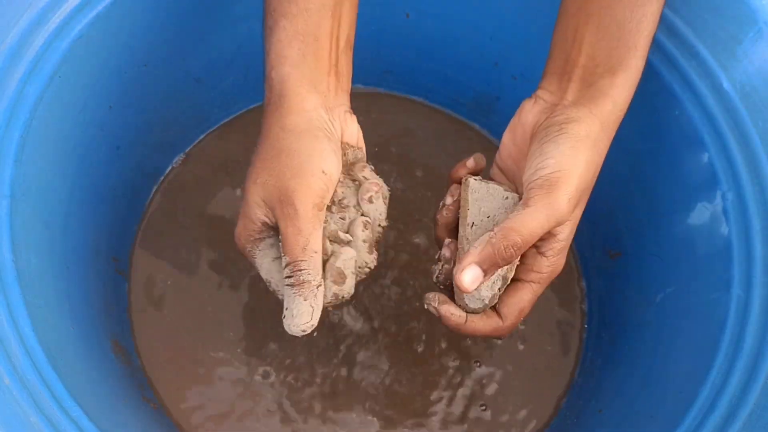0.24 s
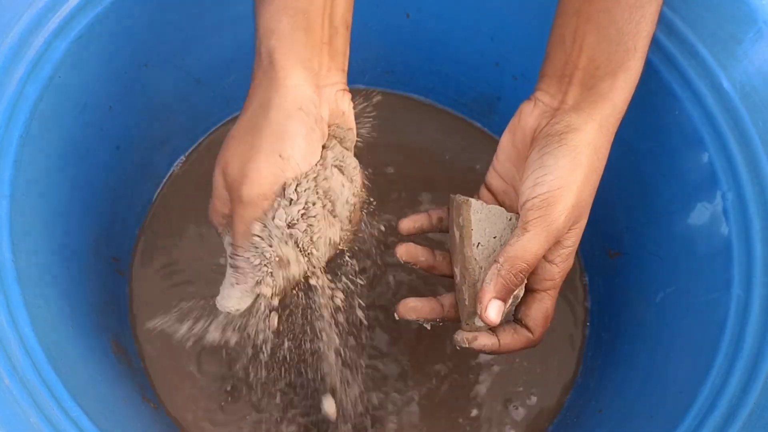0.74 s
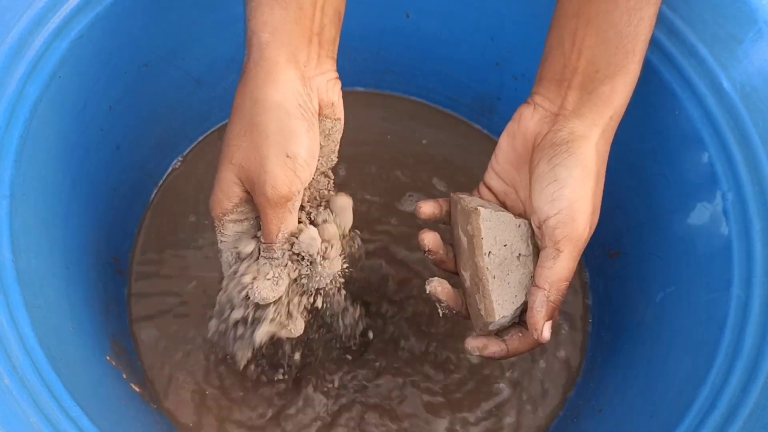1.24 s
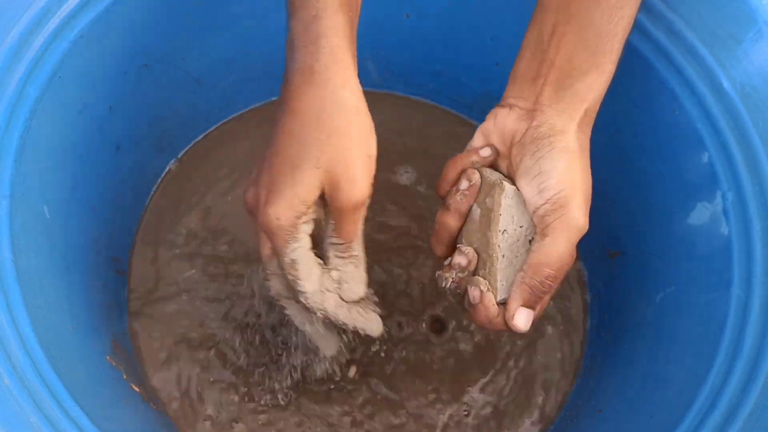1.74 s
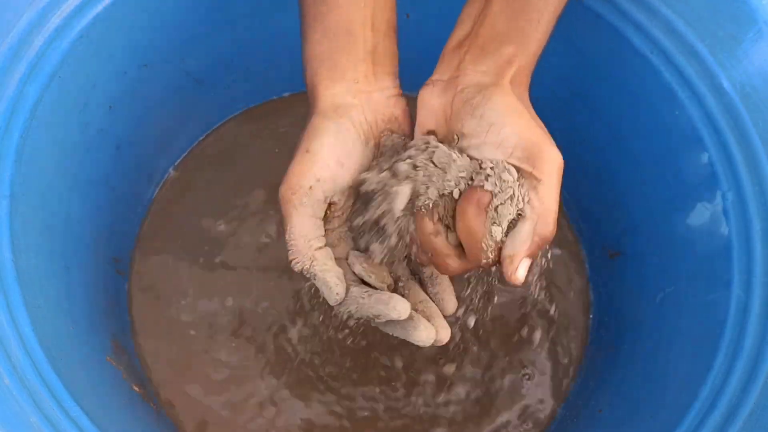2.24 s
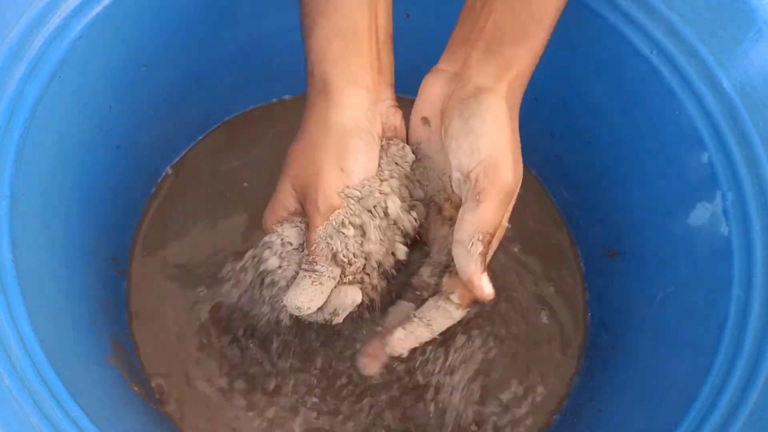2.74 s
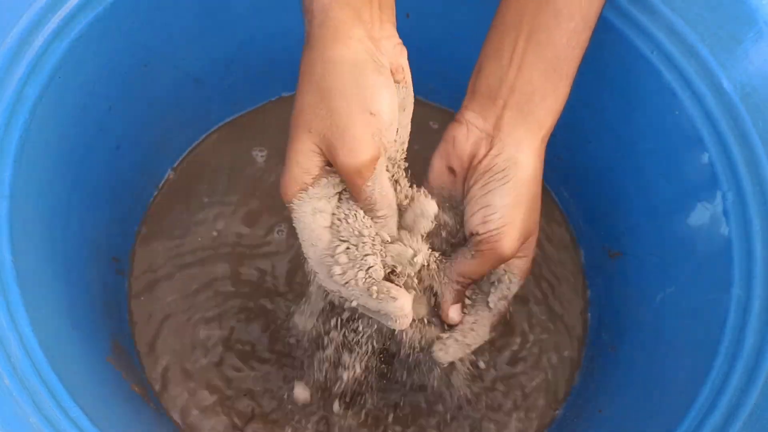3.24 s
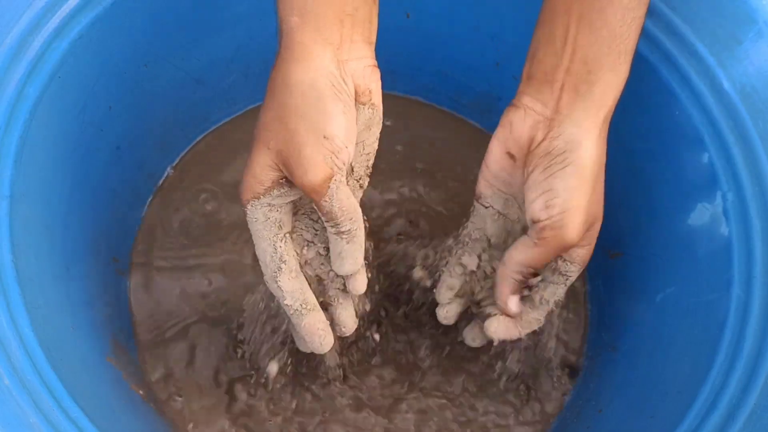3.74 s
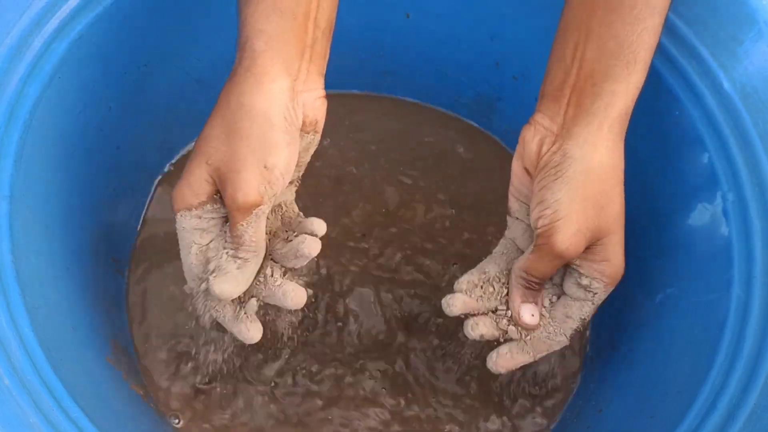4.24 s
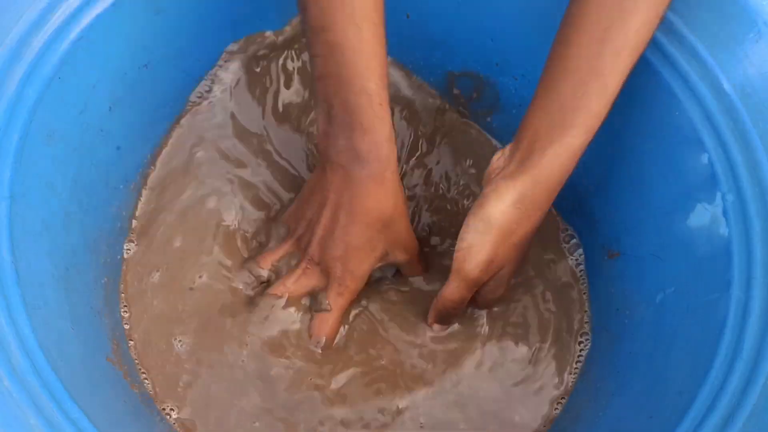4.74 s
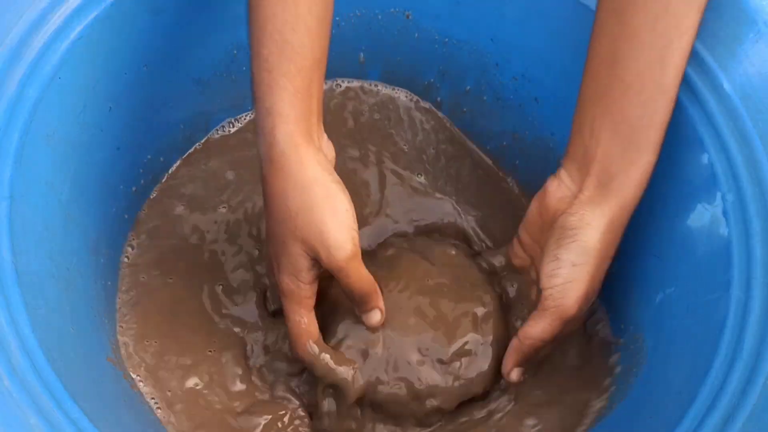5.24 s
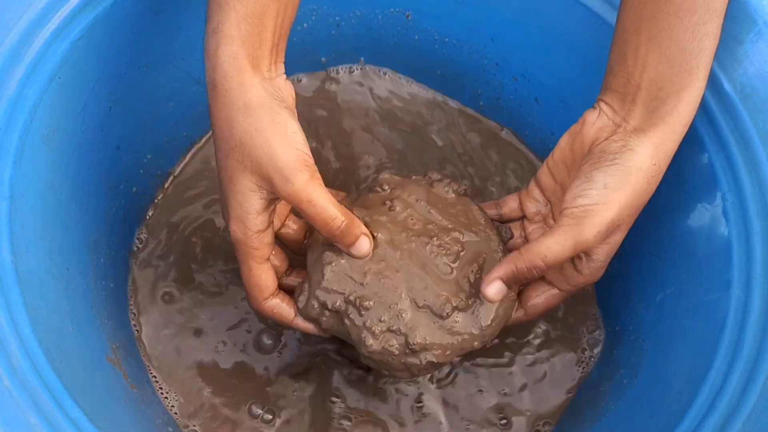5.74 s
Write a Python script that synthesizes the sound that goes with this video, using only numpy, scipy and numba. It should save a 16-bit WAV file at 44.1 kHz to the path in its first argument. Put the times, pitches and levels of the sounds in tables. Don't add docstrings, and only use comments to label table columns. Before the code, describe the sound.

Wet sandy clods crumble by hand into a tub of muddy water with plops and gritty patter, then hands plunge, slosh and lift a dripping lump.

```python
import sys
import numpy as np
from scipy import signal
from scipy.fft import rfft, irfft
from scipy.io import wavfile
from scipy.ndimage import uniform_filter1d
from numba import njit

SR = 44100
rng = np.random.default_rng(int(sys.argv[2]) if len(sys.argv) > 2 else 0)


def invert_db(level):
    return 10 ** (np.asarray(level, dtype=float) / 20)


def wav_out(sig):
    wavfile.write(sys.argv[1], SR, np.round(np.clip(np.atleast_2d(sig).T, -1, 1) * 32767).astype(np.int16))


N = 264159
PLUNGE_S, LIFT_S = 4.94, 5.65


def level(x, db):
    return x * invert_db(db) / np.sqrt(np.mean(x ** 2))


def colour(x, points):
    hz, db = np.transpose(points)
    log_hz = np.log(np.fft.rfftfreq(4096, 1 / SR) + 1)
    log_gain = np.interp(log_hz, np.log(hz), db) * np.log(10) / 20
    cepstrum = irfft(log_gain)
    cepstrum[1:2048] *= 2
    cepstrum[2049:] = 0
    return signal.fftconvolve(x, irfft(np.exp(rfft(cepstrum))))[:N]


def walk(rate):
    k = int(SR / rate)
    steps = np.repeat(rng.standard_normal(N // k + 1), k)
    return 2.2 * uniform_filter1d(uniform_filter1d(steps, k), k)[:N]


def patchy(x, edges_hz, rate, depth_db):
    below = []
    for hz in edges_hz:
        below.append(signal.sosfiltfilt(signal.butter(3, hz, fs=SR, output="sos"), x))
    parts = np.diff([0 * x, *below, x], axis=0)
    return sum(part * invert_db(depth_db * walk(rate)) for part in parts)


@njit
def ring(start, hz, size, t60, rise, glide, phase):
    out = np.zeros(N)
    for k in range(len(start)):
        first, p, length = max(int(start[k] * SR), 0), phase[k], t60[k] * SR
        step = 2 * np.pi * hz[k] / SR
        fade, swell = 1000 ** (-1 / length), np.exp(-1 / (rise[k] * SR))
        left, closed = size[k], 1.
        for i in range(min(int(.6 * length), N - first)):
            p += step * (1 + glide[k] * i / length)
            left, closed = left * fade, closed * swell
            burst = 1 - i / (.6 * length)
            out[first + i] += left * (1 - closed) * burst * np.sin(p)
    return out


def swarm(count, low_hz, high_hz, cycles, scatter_db, glide):
    when, pitch, size, life, phase = rng.random((count, 5)).T
    hz = low_hz * (high_hz / low_hz) ** pitch
    t60 = cycles * (.5 + life) / hz
    loud = invert_db(-scatter_db * np.log(1 - .97 * size))
    sound = ring(when * N / SR, hz, loud, t60, 0.43 / hz, glide * np.ones(count), 2 * np.pi * phase)
    return level(sound, 0)


# start t/s, length t/s, crumb patter level/dB, fine sand level/dB, trapped air level/dB
SHOWERS = [(0, 0.0021, -53, -49.5, -48), (0.193, 0.043, -115, -66, -73), (0.572, 0.01, -63, -55.5, -49.5),
           (0.584, 0.16, -89, -59, -73), (0.81, 0.053, -63, -65, -69), (0.914, 0.13, -63, -72, -94),
           (1.1, 0.17, -56, -61.5, -71), (1.27, 0.026, -39.5, -50, -79), (1.333, 0.1, -36, -41, -44),
           (1.571, 0.037, -46.5, -60, -43), (1.644, 0.13, -39, -42, -37), (1.79, 0.21, -53, -70, -58),
           (2.116, 0.16, -53.5, -58.5, -53), (2.282, 0.32, -87, -98, -72),
           (2.938, 0.12, -45.5, -48.5, -54.5), (3.077, 0.32, -73.5, -78.5, -73.5),
           (3.395, 0.16, -55.5, -59.5, -63.5), (3.576, 0.13, -43.5, -54.5, -43),
           (3.708, 0.076, -36, -44, -34.5), (3.793, 0.13, -35, -43, -35), (3.953, 0.16, -43, -53, -42.5),
           (4.114, 0.27, -60, -69.5, -62), (4.409, 0.03, -56, -65.5, -52.5),
           (4.462, 0.074, -61.5, -54.5, -49), (4.582, 0.052, -62, -62.5, -38.5),
           (4.67, 0.082, -67.5, -66, -59), (4.788, 0.13, -55.5, -69.5, -50)]
STIRS = [
    (4.935, 0.058, -32.5, -43.5, -29.5),
    (5.003, 0.11, -49, -69, -18),
    (5.08, 0.1, -45, -61.5, -14),
    (5.191, 0.058, -39.5, -60, -17.5),
    (5.266, 0.056, -43.5, -61, -19),
    (5.36, 0.15, -36, -52.5, -28.5),
    (5.44, 0.043, -26, -36, -18.5),
    (5.508, 0.056, -30, -50, -35),
    (5.576, 0.13, -51.5, -61, -70),
    (5.829, 0.26, -45, -50.5, -64),
]
# level/dB of patter, sand, air
CALM_DB = [-91, -82.5, -82]
ONSET_DB_PER_S, SAG_DB_PER_S, FADE_DB_PER_S = 898, 8, 326.5
TAIL_DB, TAIL_DB_PER_S = -21.5, 81.5


def activity():
    t = np.arange(0, N / SR + .002, .002)
    s, length, *layers = np.transpose(SHOWERS + STIRS)[:, :, None]
    after = np.maximum(t - s - length, 0)
    shape_db = -ONSET_DB_PER_S * np.maximum(s - t, 0)
    shape_db -= SAG_DB_PER_S * (np.clip(t - s, 0, length) - length / 2)
    shape_db += np.maximum(-FADE_DB_PER_S * after, TAIL_DB - TAIL_DB_PER_S * after)
    levels = []
    for db, calm_db in zip(layers, CALM_DB):
        power = invert_db(2 * calm_db) + invert_db(2 * (db + shape_db)).sum(axis=0)
        levels.append(np.interp(np.arange(N) / SR, t, 10 * np.log10(power)))
    return levels


def noise_gate(sand_db, air_db):
    drive_db = 0.4639 * (sand_db - CALM_DB[1]) + 0.1148 * (air_db - CALM_DB[2])
    keep = np.exp(-1 / (0.089 * SR))
    slow_db = signal.lfilter([1 - keep], [1, -keep], drive_db, zi=[drive_db[0]])[0]
    return np.maximum(drive_db, slow_db)


# f/Hz, level/dB (per Hz)
RUMBLE = [(25, -21), (90, -8), (135, -6.5), (165, -19.5), (215, -11), (320, -13), (400, -23.5),
          (600, -44.5)]


def outdoor_rumble(open_db):
    noise = colour(rng.standard_normal(N), RUMBLE)
    noise = level(patchy(noise, (60, 150, 260), rate=6, depth_db=1.5), 0)
    return noise * invert_db(-65 + open_db + walk(14))


# f/Hz, level/dB (per Hz)
HISS = [(300, -20.5), (800, -1), (2000, -4.5), (5000, -13.5), (14000, -10)]


def phone_hiss(open_db):
    return level(colour(rng.standard_normal(N), HISS), -75) * invert_db(0.072 * open_db)


# f/Hz, level/dB with the gate shut
MOTOR = [(100, -69.5), (220, -72.5), (440, -79.5), (660, -92.5), (1000, -97)]


def far_motor(open_db):
    t, out = np.arange(N) / SR, np.zeros(N)
    near = np.clip((0.79 - t) / .15, 0, 1)
    near = near * invert_db(1.33 * open_db + 8.4 * np.exp(-t / 0.22))
    for hz, db in MOTOR:
        waver = 0.79 + 0.28 * (walk(30.3) + 1j * walk(28.8))
        out += near * invert_db(db) * np.imag(waver * np.exp(2j * np.pi * hz * t))
    return out


# t/s, f/Hz, peak level/dB, ring t60/ms
FIRST_CRUMBS = [(0.0005, 273, -31, 17), (0.5622, 1820, -34.5, 25), (0.6, 119, -41, 180),
                (0.827, 2445, -42, 22), (0.9463, 2180, -50, 9.7), (1.096, 2870, -45, 4.2),
                (1.112, 2420, -32, 8.8), (1.1652, 2300, -33, 5.7), (1.2752, 2300, -36, 21),
                (1.328, 3020, -24.5, 8.3), (1.3284, 1400, -18.5, 24.4), (1.3489, 1795, -23.5, 26),
                (1.3624, 503, -29.5, 29), (1.3629, 1960, -25, 11), (1.364, 8560, -32, 35),
                (1.3969, 2500, -25.5, 13), (1.4339, 1224, -36, 58), (1.4366, 2260, -25.5, 11), ]
SCATTERED_DROPS = [(1, 3500, -44, 5.5), (1.242, 2370, -40.5, 20), (1, 2500, -35.5, 8), (1.297, 4600, -31, 6),
                   (1.2, 2400, -42, 8), (1.592, 1800, -47, 9.4), (1.645, 3200, -33.5, 5),
                   (1.685, 2900, -26.5, 6), (1.79, 1700, -32, 12), (2.6, 2800, -55, 6), (1.7, 3800, -55, 6),
                   (2.9, 4030, -47, 6), (2.236, 3200, -47, 9.6), (3.874, 323, -21, 27.5),
                   (4.69, 2980, -48.5, 5.1), (4.409, 337, -36, 56), (4.427, 318, -36, 50), (3.6, 654, -43.5, 73),
                   (3.677, 1180, -27, 13), (5.8, 3000, -59, 8), (5.4, 350, -45.5, 48), (1.575, 1100, -49.5, 72),
                   (5.225, 1200, -18.5, 36), (5.291, 1110, -22.5, 40), (4.297, 2810, -52.5, 14),
                   (4.169, 2400, -43, 14), (3, 2260, -46, 14), (2.206, 3000, -53, 8), (2.25, 1700, -51, 22),
                   (2, 1850, -50, 23), (1.4, 1300, -56, 13), (5.116, 3300, -26, 11), (5.398, 2100, -34, 10),
                   (2, 38, -44, 150)]
CLODS = [(1.553, 1120, -40, 58), (1.6312, 476, -27, 71), (1.6317, 1030, -25, 70), (1.6424, 475, -15, 25),
         (1.6586, 1200, -7.5, 8.2), (1.6576, 480, -22, 53), (1.6573, 3100, -17.5, 2.9),
         (1.6969, 1028, -13, 60), (1.697, 2400, -5.5, 3.2), (1.708, 413, -6, 18), (1.7085, 6300, -10, 2.3),
         (1.7183, 485, -26, 190), (1.745, 321.7, -23, 92), (1.745, 1090, -4.5, 10),
         (1.7656, 1310, -7.5, 7.4), (1.823, 1795, -46.5, 62), (1.898, 1807, -40.5, 13),
         (2.0186, 1766, -47, 35), (2.0931, 1775, -41.5, 37), (2.14, 650, -36, 50), (2.1448, 301, -35.5, 86),
         (2.1475, 1500, -28.5, 6.7), (2.6725, 1048, -46, 50), ]
TRICKLE = [(2.569, 4020, -58.5, 12), (2.677, 656, -53, 91), (2.832, 1006, -61.5, 41),
           (3.036, 1357, -43, 26), (3.104, 4100, -57, 8), (3.1344, 4100, -55, 11), (3.1588, 4000, -66, 9),
           (3.2297, 3690, -61, 10), (3.2803, 3800, -49.5, 8), (3.3135, 2480, -57.5, 10),
           (3.3342, 3770, -56.5, 7.7), (3.3524, 3730, -52, 8), (3.3911, 3770, -32, 3.7),
           (3.4484, 3470, -43, 7), (3.486, 3470, -52, 6.2), (3.528, 3300, -55, 6.1),
           (3.557, 3040, -36, 4.8), (3.607, 3510, -52, 6.4)]
SECOND_CRUMBS = [(2.9139, 2480, -46, 82), (2.932, 3440, -33, 25), (2.9519, 2390, -21, 6.6),
                 (2.9844, 1900, -28, 14.6), (2.991, 2970, -34, 17), (3.019, 3580, -29.5, 8.5),
                 (3.035, 2270, -31.5, 5.9), (3.093, 2030, -37, 7.6), (3.2106, 3900, -52.5, 23),
                 (3.3717, 2466, -40, 32), (3.4083, 2340, -33, 8.5), (3.4222, 2230, -25, 2.8), ]
POUR = [(3.584, 1840, -35.5, 25), (3.6305, 1370, -19.5, 6.8), (3.65, 1120, -20.5, 31),
        (3.6879, 2370, -23.5, 9.7), (3.715, 1097, -15, 34), (3.7181, 2260, -23, 3.4),
        (3.7266, 1640, -17.5, 7.3), (3.744, 1810, -20, 11), (3.7465, 1340, -17, 17),
        (3.7756, 2390, -18.5, 9), (3.821, 2630, -27, 14), (3.863, 1824, -14.5, 15), (3.874, 1012, -17, 41),
        (3.9028, 2200, -18, 3.5), (3.9177, 2040, -23.5, 17), (3.949, 1620, -20, 9.6),
        (4.0509, 1820, -24.5, 36), (4.0664, 1600, -14, 7.6), (4.08, 1410, -23.5, 31),
        (4.2341, 1050, -49.5, 310), ]
GRIT = [(3.704, 2120, -23, 7.6), (3.801, 2540, -24, 6.4), (3.811, 1040, -33, 20), (3.841, 2540, -18, 7),
        (3.93, 3520, -30, 4.9), (3.936, 2270, -22, 7.3), (3.962, 2000, -27, 6.8), (3.978, 1080, -34, 12),
        (4.009, 1490, -25.5, 8), (4.029, 1600, -27, 8.3), (4.093, 1700, -24, 6.3), (4.168, 1640, -44, 9.4),
        (4.191, 2190, -41, 10)]
DEEP = [
    (3.754, 658, -34, 48),
    (3.775, 652, -28.5, 50),
]
STRAGGLERS = [(4.3578, 1910, -41, 17), (4.408, 1450, -51, 4.5), (4.4272, 2840, -33, 10.6),
              (4.4703, 479, -24.5, 82), (4.4714, 1036, -19.5, 57), (4.485, 321, -28.5, 58),
              (4.492, 108, -29, 130), (4.5801, 880, -35, 19), (4.5972, 1377, -37.5, 35),
              (4.805, 1800, -34, 13), (4.9, 2320, -39.5, 26), (4.924, 2780, -32, 50),
              (4.933, 1730, -20.5, 13), ]
SLOSH = [(4.9512, 640, 1, 17), (4.9506, 1924, -12, 10), (4.9599, 1965, -18.5, 48),
         (4.9678, 1090, -13.5, 33), (4.969, 130, -18, 170), (4.975, 318, -2.5, 40),
         (5.021, 1790, -16.5, 46), (5.024, 1100, -18.5, 63), (5.0302, 3190, -22, 24),
         (5.0605, 2420, -23, 24), (5.1199, 693.6, -19, 160), (5.1158, 1328, -10.5, 38),
         (5.1782, 800, -14.5, 37), (5.436, 1840, -19.5, 13), (5.46, 120.7, -24.5, 170),
         (5.446, 276, -25, 120), (5.4535, 670, -3.5, 29), (5.4562, 3967, -14, 8.3),
         (5.4695, 1753, -1.5, 6.7), (5.47, 2910, -4.5, 4.5), (5.4721, 667, -12, 42), (5.4868, 963, -7, 42),
         (5.5027, 4754, -18.5, 15), (5.522, 573, -12.5, 99), (5.5304, 740, -5.5, 24.5),
         (5.5281, 1349, -19, 75), (5.5398, 1857, -14.5, 16), (5.5739, 814, -23, 52), ]
BURPS = [(5.041, 1583, -10.5, 20), (5.077, 1450, -26, 24), (5.099, 1423, -6.5, 14), (5.1, 326, -24, 100),
         (5.138, 1370, -20, 35), (5.151, 1198, -14.5, 43), (5.18, 1280, -16, 22), (5.205, 1380, -17.5, 124),
         (5.24, 1890, -24, 21), (5.28, 319.9, -33, 55), (5.318, 627, -26, 64), (5.369, 640, -33.5, 90),
         (5.398, 1500, -25.5, 25), (5.715, 755, -49.5, 21), (5.742, 1880, -46, 14), (5.836, 3010, -32, 39),
         (5.864, 2620, -33, 23), (5.888, 1426, -33.5, 47), (5.89, 2530, -35, 15), (5.909, 4400, -31, 12),
         (5.978, 1900, -36, 18)]
DRIPS = [(5.712, 4570, -34.5, 12), (5.747, 1350, -42, 16), (5.8142, 2880, -27.5, 32),
         (5.8332, 3890, -26, 11), (5.84, 4630, -28, 17), (5.8543, 2680, -29.5, 29),
         (5.858, 4840, -24.5, 13), (5.8896, 2010, -28, 55), (5.9104, 5790, -22.5, 2.3),
         (5.9191, 1900, -20.5, 15.5), (5.916, 1207, -27.5, 50)]
BUBBLES = (FIRST_CRUMBS + CLODS + SECOND_CRUMBS + POUR + STRAGGLERS + SLOSH + DRIPS
           + DEEP + TRICKLE + GRIT + BURPS + SCATTERED_DROPS)


def plops():
    s, hz, db, t60_ms = np.transpose(BUBBLES)
    c = rng.random((len(s), 4, 8))
    turn, each = 2 * np.pi, np.ones(len(s))
    t60 = np.clip(t60_ms, 3, 150) * 0.0014
    loud, hit = invert_db(db + 9.5), s - .0008
    stirred = (s > PLUNGE_S) & (s < LIFT_S)
    large = hz < 720
    rise = np.where(stirred | large, 1.6, .9) / hz
    glide = np.where(stirred & (s > 5.48), .42, .1)
    main = ring(hit, hz * .98, loud, t60, rise, glide, turn * c[:, 0, 0])
    twin_hz = hz * (.9 + 0.24 * c[:, 0, 2])
    twin = loud * invert_db(np.where(large, -11., -6.))
    main += ring(s + .002 * c[:, 0, 1], twin_hz, twin, 0.53 * t60, 0.74 / hz, 0.22 * c[:, 0, 3],
                 turn * c[:, 0, 4])
    chirp = loud * invert_db(np.where(stirred, -20., -9.))
    click = ring(hit, np.minimum(1.5 * hz, 5000), chirp, 0.0022 * each, 0.000058 * each, -.95 * each, 0 * each)
    slap = loud * invert_db(np.where(stirred, -25., -6.))
    click += ring(hit, 3200 * each, slap, 0.00065 * each, .00004 * each, -.5 * each, 0 * each)
    click = invert_db(2.0) * signal.sosfilt(signal.butter(2, 950, "high", fs=SR, output="sos"), click)
    later = .011 * c[:, 2]
    small_hz = np.minimum(hz[:, None] * 1.029 * 2.3 ** c[:, 1], 9000).ravel()
    small = (loud[:, None] * invert_db(-7.0 - 430 * later - 19.5 * c[:, 3])).ravel()
    cluster = ring((s[:, None] + later).ravel(), small_hz, small, 18 / small_hz, 0.48 / small_hz,
                   -.2 + 0 * small, turn * c[:, 3].ravel())
    echo = np.roll(click + cluster, int(0.003 * SR))
    return main + click + cluster + invert_db(-9.0) * echo


def clumps(rate):
    hits = (rng.random(N) < rate / SR) * invert_db(2.9 * np.clip(rng.standard_normal(N), -2, 1) - 17.5)
    hits[(np.array(BUBBLES)[:, 0] * SR).astype(int)] = 1
    burst = signal.fftconvolve(hits, np.exp(-np.arange(1500) / SR / 0.0049))[:N]
    return level(0.23 + np.minimum(burst, 1.3), 0)


def crumb_patter(patter_db, surge):
    bubbles = swarm(count=10000, low_hz=1690, high_hz=4380, cycles=24, scatter_db=2.4, glide=0.079)
    return bubbles * surge * invert_db(patter_db - 1.0)


# f/Hz, level/dB
GUSH = [(250, -24.5), (330, -16), (400, -24), (530, -8.5), (670, -7), (850, -11), (1100, 1), (1380, 0),
        (1900, -4), (2400, -19), (4400, -36), (7000, -70)]


def trapped_air(air_db, surge):
    gurgle = swarm(count=18000, low_hz=273.7, high_hz=4314, cycles=32, scatter_db=3.0, glide=0.25)
    froth = invert_db(2.5) * rng.standard_normal(N)
    air = patchy(colour(gurgle + froth, GUSH), (450, 850, 1250, 1700, 2400), rate=14, depth_db=1.1)
    return level(air, -1.6) * invert_db(air_db) * surge ** 0.7


# f/Hz, level/dB (per Hz)
SPRAY = [(3000, -28), (5000, 0.5), (9000, -2.5), (13000, -5.5), (16000, -11.5)]


def fine_sand(sand_db, surge):
    grains = rng.standard_normal(N) * invert_db(1.8 * rng.exponential(size=N) + 2.7 * walk(70))
    spray = level(colour(grains, SPRAY), -3.8) * invert_db(sand_db) * surge ** 0.31
    return patchy(spray, (5100, 6200, 7500, 10500), rate=11, depth_db=2.4)


@njit
def walls(x, lags, gain, damp):
    line, soft, out = np.zeros((6, 1024)), np.zeros(6), np.zeros(len(x))
    for i in range(len(x)):
        total = 0.
        for k in range(6):
            soft[k] += (1 - damp) * (gain[k] * line[k, (i - lags[k]) & 1023] - soft[k])
            total += soft[k]
            out[i] += soft[k] * (1 - 2 * (k % 2))
        for k in range(6):
            line[k, i & 1023] = x[i] + soft[k] - total / 3
    return out


def tub_echo(water):
    lags = np.array([113, 173, 257, 349, 487, 641])
    return invert_db(-17) * walls(water, lags, invert_db(-60 * lags / SR / 0.15), 0.86)


# t/s, peak level/dB
TICKS = [(0.56, -38.5), (1.275, -28.5), (1.326, -22.5), (1.3617, -10), (1.4318, -35.5), (1.59, -25.5),
         (1.632, -19.5), (1.6573, -21.5), (1.7065, 2), (1.744, -11), (1.764, -24.5), (2.14, -30.5),
         (2.935, -44), (2.9513, -22.5), (3.02, -30.5), (3.034, -30), (3.5583, -35.5), (3.651, -25.5),
         (3.716, -25), (3.731, -22), (3.77, -17), (3.8711, -13), (4.05, -26.5), (4.47, -45), (4.818, -36),
         (4.93, -28.5), (4.9634, -19), (5.1, -42), (5.121, -37), (5.169, -44), (5.26, -42), (5.443, -36),
         (5.463, -17), (5.5383, -28.5), (5.56, -24), (5.885, -27), (5.9073, -19.5)]


def ticks():
    s, db = np.transpose(TICKS)
    hits = np.zeros(N)
    hits[(s * SR).astype(int)] = invert_db(db)
    age = np.arange(4000) / SR
    shape = (1 + invert_db(-6.5)) * np.exp(-age / 0.0025) * (1 - np.exp(-age / 0.0011))
    fizz = level(colour(rng.standard_normal(N), SPRAY), -8.0)
    return signal.fftconvolve(hits, shape)[:N] * fizz


def blurred_tone(start, end, hz, db, blur_hz, steady):
    t = np.arange(N) / SR
    fade = np.clip(np.minimum(t - start + 0.051, end - t) / 0.061, 0, 1)
    waver = steady + .5 * (walk(blur_hz) + 1j * walk(blur_hz))
    return fade * invert_db(db) * np.imag(waver * np.exp(2j * np.pi * hz * t))


# start t/s, end t/s, f/Hz, level/dB, blur f/Hz
HUMS = [(2.545, 2.9, 620, -68.5, 130), (3.013, 3.227, 1015, -52.5, 90), (0.915, 0.99, 980, -67, 70),
        (2.91, 3.244, 630, -55, 140), (3.304, 3.55, 625, -62, 67), (3.5, 3.8, 665, -47.5, 120),
        (2.88, 3.19, 330, -56.5, 480), (3.38, 3.65, 450, -56, 140), (2.14, 2.33, 270, -48, 280),
        (2.07, 2.36, 6800, -70, 1500), (5.09, 5.26, 1400, -22, 150), (4.76, 4.8, 6600, -61, 900),
        (1.79, 2.06, 1500, -59.5, 200), (3.06, 3.36, 4000, -71.5, 1400)]


def soft_hums():
    return sum(blurred_tone(*hum, steady=.12) for hum in HUMS)


# start t/s, end t/s, level/dB
HORN = [
    (3.967, 4.292, -52.5),
]
# multiple of the pitch, level/dB
HORN_ORDERS = [(2, 0.5), (3, -6), (4, -12), (5, -2), (6, -7.5), (7, -15)]
# start t/s, end t/s, f/Hz, level/dB
WHISTLE = (5.19, 5.5, 3860, -49)


def far_horn():
    out = blurred_tone(*WHISTLE, blur_hz=60, steady=1.3)
    for start, end, db in HORN:
        for multiple, rel_db in HORN_ORDERS:
            out += blurred_tone(start, end, multiple * 554, db + rel_db, blur_hz=60, steady=1.15)
    return out


def scene():
    patter_db, sand_db, air_db = activity()
    open_db = noise_gate(sand_db, air_db)
    surge = np.where(np.arange(N) / SR < PLUNGE_S, clumps(rate=110), invert_db(.6 * walk(50)))
    water = plops() + ticks() + crumb_patter(patter_db, surge)
    water += trapped_air(air_db, surge) + fine_sand(sand_db, surge)
    outdoors = outdoor_rumble(open_db) + far_motor(open_db) + soft_hums() + far_horn()
    return (water + tub_echo(water) + outdoors + phone_hiss(open_db))[None]


# f/Hz, level/dB
MIC = [(20, -18.5), (60, -3.5), (4400, 1), (5050, -7.5), (6500, 3.5), (7550, -6.5), (8900, -2),
       (10400, -10.5), (12500, -5.5), (15300, -5.5), (16200, -33)]


def microphone(dry):
    return 0.78 * np.tanh(colour(dry[0], MIC)[None] / 0.9)


def band_limit(x):
    return signal.sosfilt(signal.butter(12, 16340, fs=SR, output="sos"), x)


def record(dry):
    mix = microphone(dry)
    return band_limit(mix)


dry = scene()
out = record(dry)
wav_out(out)
```